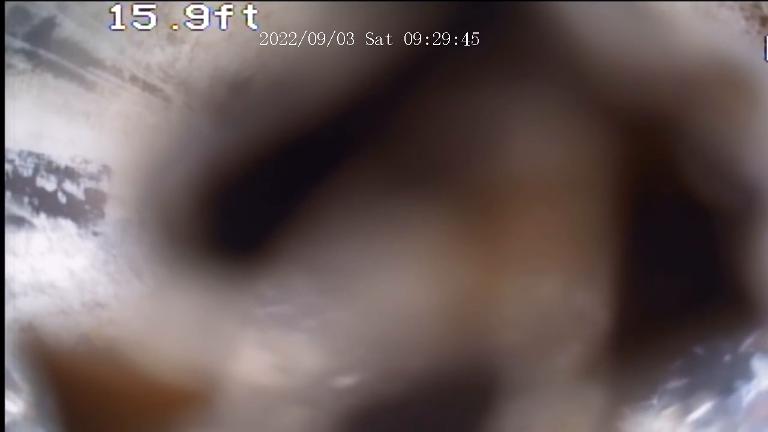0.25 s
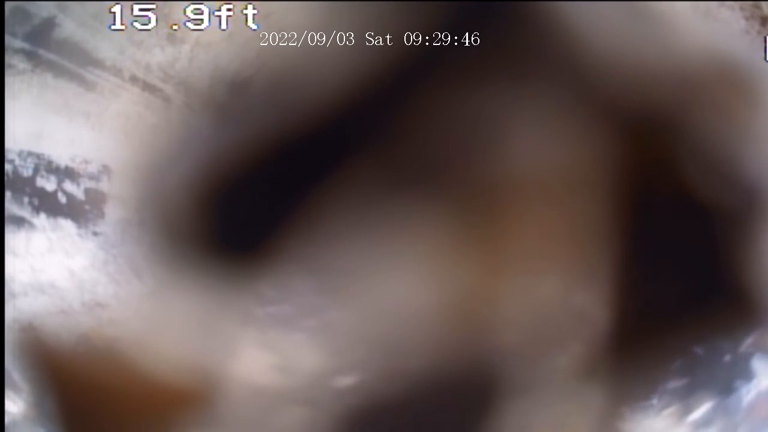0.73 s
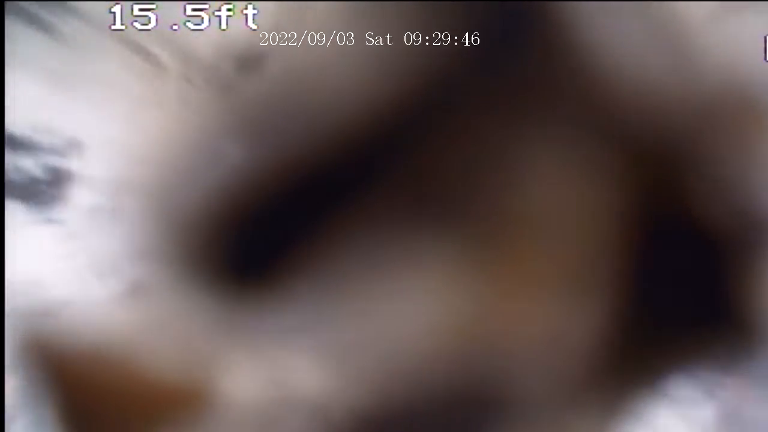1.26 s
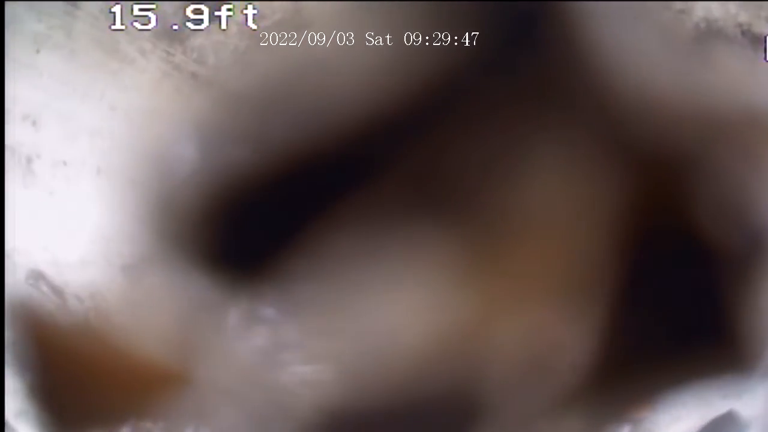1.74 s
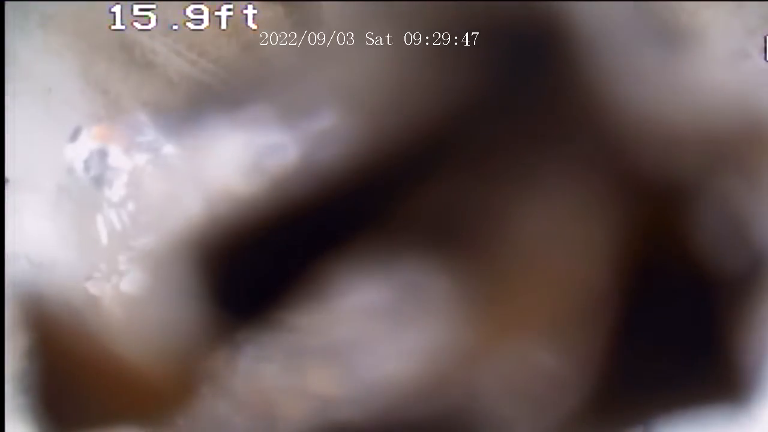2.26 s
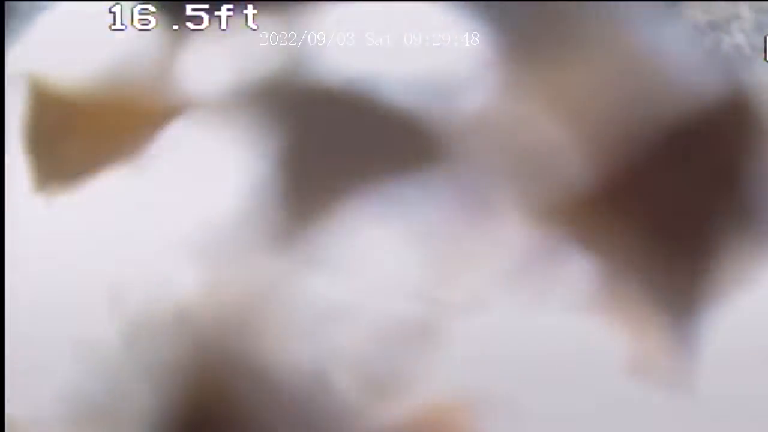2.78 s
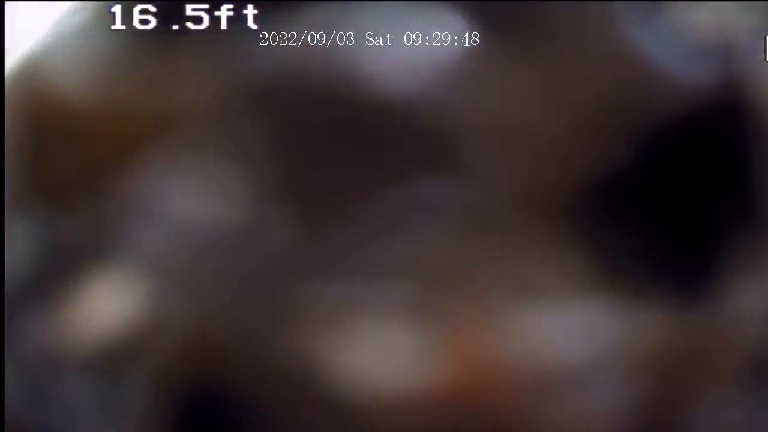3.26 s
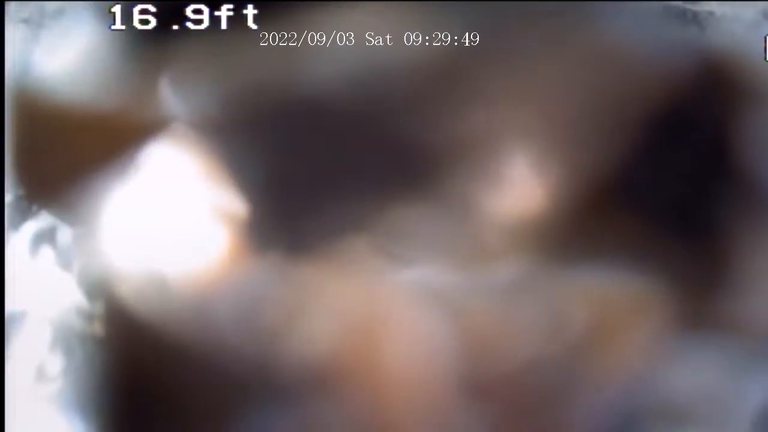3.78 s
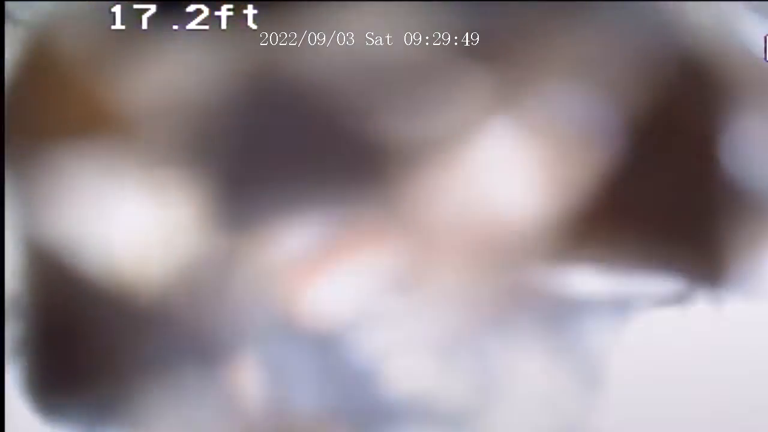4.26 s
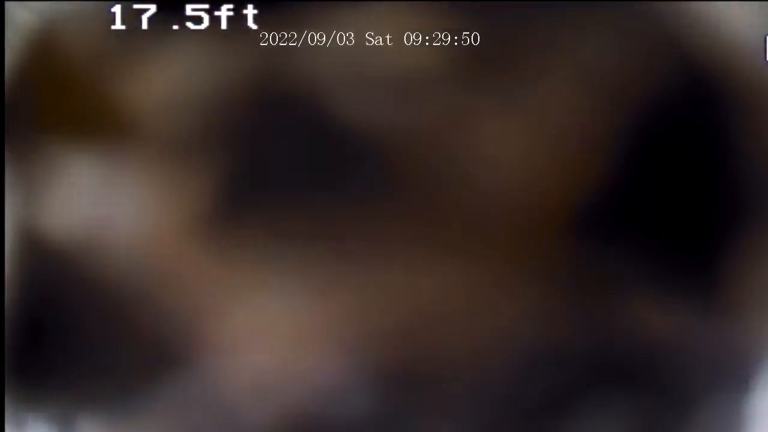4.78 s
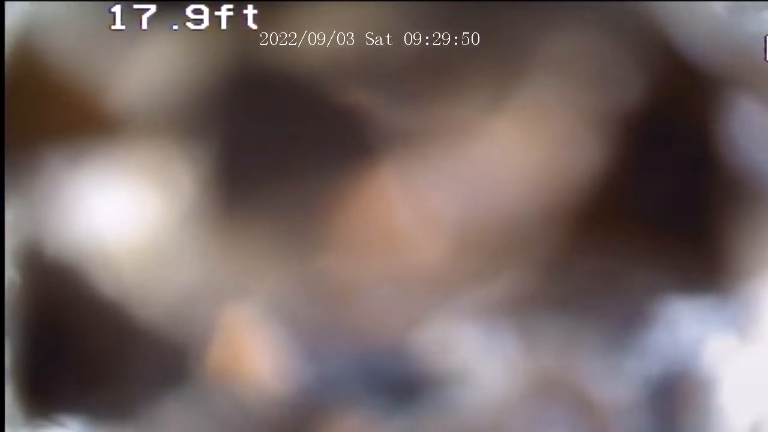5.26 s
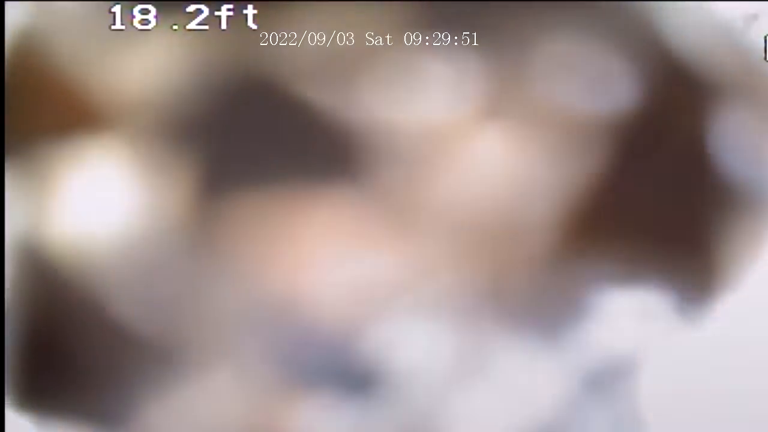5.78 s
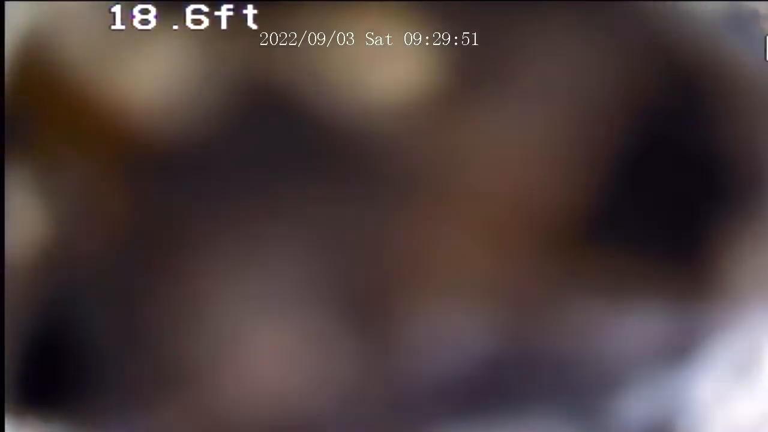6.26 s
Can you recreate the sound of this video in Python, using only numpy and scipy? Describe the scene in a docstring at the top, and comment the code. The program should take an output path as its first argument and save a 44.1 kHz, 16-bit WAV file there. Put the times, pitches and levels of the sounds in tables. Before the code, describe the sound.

In a small room with a short echo, a stiff cable is fed from a reel into a drain pipe. Low, uneven drum rumble, faint rubbing, microphone hiss, a weak whistle and a very thin high whine run throughout. At about 0.16 s a loop slaps the steel frame with a rattle and the loudest hollow bump, leaving a low hum until about 1 s. A dry double clack comes at 1.1, knocks from 1.3, and a knock with a short honk at 1.76. Scrapes lead to a strong knock, thud and honk at 2.34, another knock at 2.5, then total silence from 2.65 to 2.76. A sharp slap and thud hit at 3.26; another slap with a bump at 3.98. From 4.25 to 5.1 lighter knocks cluster, with small honks near 4.63 and 4.75. A soft knock lands at 5.6, then ticks, scrapes and a final slap with double bump at 6.23, fading into rumble.

```python
"""An inspection camera's stiff push cable is fed into a drain in a small room.
From the start: the reel rumbles (driven drum modes), the cable rubs the pipe (stick-slip noise), and
the monitor's microphone adds hiss, a faint whistle and a thin whine. Then a first of four slaps on the
reel's frame, clacks, knocks, bumps, thuds and ticks (struck modes), humming drum tones (decaying sines),
and later honking judders (unsteady sines). The sound cuts out once for a moment."""
import sys
import numpy as np
from scipy import signal
from scipy.fft import rfft, irfft, next_fast_len
from scipy.io import wavfile
from scipy.ndimage import uniform_filter1d, map_coordinates

SR = 44100
rng = np.random.default_rng(int(sys.argv[2]) if len(sys.argv) > 2 else 0)


def waveform_to_disk(signal):
    """Save audio, clipped to [-1, 1], as 16-bit WAV at the path in sys.argv[1]."""
    frames = np.transpose(np.atleast_2d(signal))
    scaled = np.clip(frames, -1, 1) * 32767
    samples = np.round(scaled).astype(np.int16)
    wavfile.write(sys.argv[1], SR, samples)


N = 287532
TIME = np.arange(N) / SR
AGE = TIME[:SR // 2]  # time since the onset of a short event


def amp(db):
    """Decibels to gain."""
    return 10 ** (np.asarray(db) / 20)


def unit(x):
    """Scale to rms 1."""
    return x / np.sqrt(np.mean(x ** 2) + 1e-20)


def crest(x):
    """Scale so that the loudest 5 ms have rms 1."""
    return x / np.sqrt(uniform_filter1d(x ** 2, size=220).max() + 1e-20)


def along(points, hz):
    """Interpolate (f/Hz, value) points on a log frequency axis."""
    f, v = np.transpose(points)
    return np.interp(np.log(hz + 1), np.log(f + 1), v)


def wobble(rate_hz):
    """A smooth random curve with rate_hz knots a second."""
    knots = rng.standard_normal(int(N * rate_hz / SR) + 4)
    return map_coordinates(knots, [TIME * rate_hz])


def swells(rows):
    """Sum of bell-shaped swells from (centre t/s, level/dB, half length/s) rows."""
    return sum(amp(db) * np.exp(-.5 * ((TIME - s) / half_s) ** 2) for s, db, half_s in rows)


def filtered(x, response):
    """x times a complex response of frequency."""
    m = next_fast_len(len(x) + SR // 2)
    return irfft(rfft(x, m) * response(np.fft.rfftfreq(m, 1 / SR)), m)[:len(x)]


def coloured(x, spectrum):
    """x with a broad spectral shape."""
    return filtered(x, lambda f: amp(along(spectrum, f)))


def ring(x, modes):
    """x drives a body's resonances; little radiates outside their range."""
    y = 0
    for k, (hz, width_hz, db) in enumerate(modes):
        b, a = signal.iirpeak(hz, hz / width_hz, SR)
        y = y + (-1) ** k * amp(db) * signal.lfilter(b, a, x)  # alternating phase
    edges_hz = [modes[0][0] * 0.59, min(modes[-1][0] * 1.27, SR * .45)]
    return signal.sosfilt(signal.butter(2, edges_hz, 'band', fs=SR, output='sos'), y)


# dB scatter of mode levels: each contact point favours other modes
CONTACT_SPREAD_DB = 1.5


def struck(modes):
    """A body's modes as excited from a random contact point."""
    return [(hz, width_hz, db + CONTACT_SPREAD_DB * rng.standard_normal()) for hz, width_hz, db in modes]


def add(track, s, sound):
    """Mix a sound in at s seconds."""
    start = max(round(s * SR), 0)
    track[start:start + len(sound)] += sound[:max(N - start, 0)]


def chatter(hold_s, t60_s):
    """Contact force: a dense run of tiny impacts that holds briefly and dies."""
    return rng.standard_normal(len(AGE)) * amp(-60 * np.maximum(AGE - hold_s, 0) / t60_s)


def slips(rate_hz, spread_db):
    """Stick-slip friction: impulses of uneven size at random moments, rms 1."""
    moments = rng.random(N) < rate_hz / SR
    signs = rng.choice([-1, 1], N)
    return unit(moments * signs * amp(spread_db * rng.standard_normal(N)))


def sustained(x, span_s):
    """Level a vibration to rms 1 over span_s, as under a constant push."""
    return x / np.sqrt(np.abs(uniform_filter1d(x ** 2, max(int(span_s * SR), 2))) + 1e-12)


# feed strength, heard as rumble: t/s, level/dB
FEED = [(0, -42.5), (.22, -33), (.4, -45), (.62, -54), (.74, -36.5), (.91, -54), (1.02, -42.5), (1.42, -45),
        (1.68, -65), (1.8, -42.5), (2.05, -52), (2.35, -44.5), (3.15, -53.5), (3.3, -45.5), (3.55, -50.5),
        (3.8, -55), (4.05, -48.5), (4.35, -44.5), (4.47, -56), (4.75, -44.5), (4.87, -54), (5.13, -43.5),
        (5.4, -53), (5.6, -46), (5.73, -49), (5.88, -43), (6.15, -55), (6.52, -45.5)]


def feed_level_db():
    """How hard the cable is fed, sample by sample."""
    s, db = np.transpose(FEED)
    return np.interp(TIME, s, db)


# reel drum's deep and upper resonances: f/Hz, width/Hz, level/dB
DRUM_DEEP = [(86, 7.5, -9), (114, 11.3, -6), (144.2, 12.4, -3)]
DRUM_UPPER = [(181.96, 5.4, 1.5), (222.6, 24, -8), (244.4, 97, -12.5)]
UPPER_DRUM_DB, UPPER_SWAY_DB = -3.5, 4  # upper modes against deep ones, and their slow drift


def reel():
    """Small jolts keep the drum's low modes ringing, louder as the cable is fed harder."""
    deep = sustained(ring(slips(rate_hz=500, spread_db=2), DRUM_DEEP), span_s=0.16)
    upper = sustained(ring(slips(rate_hz=500, spread_db=0.5), DRUM_UPPER), span_s=0.053)
    upper_gain = amp(UPPER_DRUM_DB + UPPER_SWAY_DB * wobble(7.0))
    return amp(feed_level_db() - 3.5) * (deep + upper_gain * upper)


# catches of the jacket on the lip, and the even rub between them (gain)
SNAG_RATE_HZ, SNAG_DECAY_S, SMOOTH_GAIN = 60, 0.0044, 0.68


def snags(rate_hz, decay_s):
    """Grip of a rough surface: sudden releases, each falling to 1/e in decay_s."""
    releases = (rng.random(N) < rate_hz / SR) * rng.uniform(0.22, 1, N)
    return signal.lfilter([1], [1, -np.exp(-1 / (decay_s * SR))], releases)


def friction():
    """Dense slips of the jacket, gripping and letting go unevenly."""
    grip = SMOOTH_GAIN + snags(SNAG_RATE_HZ, SNAG_DECAY_S)
    return slips(rate_hz=1300, spread_db=3.0) * grip


# short strokes of the cable over the pipe's lip: centre t/s, level/dB, half length/s, hardness/dB
SCRAPES = [(0.718, -48.5, 0.033, -3), (0.734, -46, .012, -16), (0.994, -49.5, 0.025, -6),
           (1.789, -45, 0.042, 2.5), (2.17, -46.5, 0.047, -10), (2.298, -43, 0.026, 3),
           (2.368, -45.5, 0.021, 6), (2.907, -53, 0.14, -13), (3.07, -54.5, 0.035, -1),
           (3.145, -54, 0.0085, 2.5), (3.515, -60.5, 0.23, 4.5), (3.72, -54, 0.033, 0.5),
           (3.891, -42.5, 0.015, -7.5), (4.311, -49, 0.04, -4.5), (4.455, -50.5, 0.0099, -5.5),
           (4.655, -49.5, 0.15, -1.5), (4.964, -51.5, 0.033, 1), (5.094, -49, 0.047, -2.5),
           (5.38, -57, 0.019, 4.5), (5.601, -44, 0.039, -9), (5.822, -48.5, 0.043, -5.5),
           (5.941, -47.5, 0.024, -3), (6.06, -49.5, 0.047, -10), (6.16, -42.5, 0.013, -1)]
# smooth glides in which the swish swells: centre t/s, level/dB, half length/s
GLIDES = [(5.65, -71.5, 0.077), (6.46, -73.5, 0.24)]
# resonances of pipe (hollow, upper), reel frame and cable: f/Hz, width/Hz, level/dB
PIPE_HOLLOW = [(343.3, 64, -9), (463.6, 39.5, -2), (534.6, 68.5, -6.5)]
PIPE_UPPER = [(728, 108, 0.5), (843, 67, 1.5), (922, 89, -2), (1038, 80, 2), (1180, 90, -5),
              (1234, 64, -2.5), (1471, 63, -6), (1939, 53, -9), (2170, 74, -18), (2380, 230, -19),
              (2826, 150, -18)]
FRAME = [(337, 40, 4.5), (491, 75, -1), (1081, 97, -7), (1192, 112, -1.5), (1302, 147, -3),
         (1520, 110, -10.5), (1936, 140, -15.5)]
CABLE = [(1050, 320, -4.5), (1331, 170, -0.5), (1941, 50, 0.5), (2202, 62, -2.5), (2480, 64, -6),
         (2694, 80, -6.5), (2915, 61, -6), (3114, 53, -6.5), (3320, 130, -10.5), (3830, 380, -22.5)]
# spectra of the gritty edge and of the airy jacket: f/Hz, level/dB
GRIT = [(300, 1), (700, 10), (1400, -29.5), (1700, -26), (2800, -5), (4000, -8.5), (7000, -14),
        (15000, -46)]
SWISH = [(2500, -4), (4500, -7), (6000, -1.5), (8000, -9), (12000, -13.5), (15000, -18.5)]
DRAG_DB, DRAG_GROWS_DB_PER_DB, USUAL_FEED_DB = -67.5, 0.36, -47.5  # light drag at the usual feed
SWISH_DB = -78.5  # steady swish, before the glides
BODY_SWAY_DB = 1.5  # the pipe's hollow body comes and goes under the rub


def slide():
    """Uneven slips over the pipe's lip swell with each stroke; hard strokes rasp, soft ones sound hollow."""
    drag = amp(DRAG_DB + DRAG_GROWS_DB_PER_DB * (feed_level_db() - USUAL_FEED_DB))
    soft = swells([(s, db, half_s) for s, db, half_s, _ in SCRAPES])
    hard = swells([(s, db + hard_db, half_s) for s, db, half_s, hard_db in SCRAPES])

    rub_level = np.hypot(amp(6.0 + BODY_SWAY_DB * wobble(14)) * drag, amp(-5.5) * soft)
    rub = rub_level * unit(ring(friction(), PIPE_HOLLOW))

    edge = friction()
    grit = amp(-9.5) * unit(coloured(edge, GRIT))
    rasp_level = np.hypot(amp(-5.0) * drag, amp(-10.5) * hard)
    rasp = rasp_level * (unit(ring(edge, PIPE_UPPER)) + grit)

    # the drag keeps the frame and the cable faintly ringing
    fine = rng.standard_normal(N)
    ringing = drag * (amp(2.5) * unit(ring(fine, FRAME)) + amp(-9.0) * unit(ring(fine, CABLE)))

    air = unit(coloured(slips(rate_hz=11000, spread_db=4.5), SWISH))
    swish = amp(-4) * (amp(SWISH_DB) + swells(GLIDES)) * air
    return rub + rasp + ringing + swish


# microphone hiss spectrum: f/Hz, level/dB
HISS = [(20, 18), (36, 2), (50, 10), (70, 17), (200, 11), (700, -13.5), (1700, -13), (4000, -25),
        (5200, -15.5), (6300, -25), (8500, -30.5), (15500, -29.5)]
# faint whistle in the hiss: f/Hz, width/Hz, rms level/dB
WHISTLE = (4953, 30, -85)
# the picture's line whine: f/Hz, rms level/dB
WHINE = (15626, -88)


def monitor():
    """Shaped noise hisses, narrow-band noise whistles faintly, a steady sine whines."""
    hiss = amp(-56.5) * unit(coloured(rng.standard_normal(N), HISS))
    hz, width_hz, db = WHISTLE
    narrow = filtered(rng.standard_normal(N), lambda f: 1 / (1 + (2 * (f - hz) / width_hz) ** 2))
    whistle = amp(db) * unit(narrow)
    whine_hz, whine_db = WHINE
    whine = amp(whine_db) * unit(np.sin(2 * np.pi * whine_hz * TIME))
    return hiss + whistle + whine


# hard contacts of the cable: t/s, level/dB, brightness/dB
TICKS = [(0.2527, -46, -27), (0.43, -56, -35), (1.011, -61, -9), (1.183, -46.5, -7.5), (1.375, -51.5, -10),
         (1.4484, -50.5, -25), (1.5506, -54.5, -7), (1.689, -52.5, -11.5), (1.9445, -57, -11),
         (2.106, -56.5, -7.5), (2.265, -51.5, -34), (2.292, -49, -14), (2.43, -53, -11.5),
         (2.808, -61.5, -9), (3.13, -61.5, -22), (3.2455, -40.5, -20), (3.8681, -46.5, -11.5),
         (4.555, -65, -2.5), (4.667, -57.5, -11), (4.702, -64, -10), (4.916, -55, -5.5), (5.446, -54.5, -9),
         (5.912, -61, -15), (6.138, -57, -6.5), (6.164, -51, -12.5)]
# treble spectrum of a hard contact: f/Hz, level/dB
SNAP = [(1500, -27), (3500, 1), (4700, 1), (7000, 0.5), (8500, -6.5), (11500, -6.5), (15000, -24.5)]


def ticks():
    """Hard contacts, slaps included, ring the cable and snap in the treble by their brightness."""
    out = np.zeros(N)
    from_slaps = [(s, db, bright_db) for s, db, bright_db, _ in SLAPS]
    for s, db, bright_db in TICKS + from_slaps:
        body = crest(ring(chatter(hold_s=0.0033, t60_s=0.046), struck(CABLE)))
        force = chatter(hold_s=0.0053, t60_s=0.066) + amp(-18.0) * chatter(hold_s=0.011, t60_s=0.71)
        snap = crest(coloured(force, SNAP))
        add(out, s - .002, amp(db - 2.5) * body + amp(db + bright_db - 1.5) * snap)
    return out


# dry clacks of the cable guide: t/s, level/dB
CLACKS = [(0.157, -50), (1.084, -42), (1.094, -47), (3.262, -43), (3.98, -56), (6.231, -52)]
# guide resonances: f/Hz, width/Hz, level/dB
GUIDE = [(770, 220, 0.5), (1060, 140, 6.5), (1430, 460, -4.5), (1910, 220, 2), (2160, 240, 5),
         (2410, 300, -9), (3040, 510, -10.5)]


def clacks():
    """The guide is rapped and damped at once by the cable lying in it."""
    out = np.zeros(N)
    for s, db in CLACKS:
        add(out, s, amp(db) * crest(ring(chatter(hold_s=0.004, t60_s=0.031), GUIDE)))
    return out


# a loop of cable slapping the frame: t/s, level/dB, brightness/dB, after-rattle/dB
SLAPS = [(.156, -38.5, -18, -13.5), (3.2631, -38.5, -9, -26), (3.979, -41.5, -10.5, -23),
         (6.2317, -40, -8, -23)]
# a slap snaps, rings the frame, knocks the pipe, then rocks the reel: lags after the slap
FRAME_LAG_S, KNOCK_LAG_S, ROCK_LAG_S = 0.002917, .011, 0.032
RATTLE_DB = 7  # uneven drive as the cable bounces on the frame


def slaps():
    """A loop of cable springs against the steel frame, which rings and rattles on."""
    out = np.zeros(N)
    for s, db, _, rattle_db in SLAPS:
        bounce = amp(RATTLE_DB * wobble(120)[:len(AGE)])
        rattle = amp(rattle_db) * chatter(hold_s=0.019, t60_s=0.38)
        force = bounce * (chatter(hold_s=0.0082, t60_s=0.052) + rattle)
        add(out, s + FRAME_LAG_S, amp(db + 2.5) * crest(ring(force, struck(FRAME))))
    return out


# the cable striking the pipe: t/s, level/dB, hardness/dB
KNOCKS = [(.168, -29, -12), (0.437, -54.5, -19), (1.279, -39.5, -7), (1.452, -44, -8.5), (1.691, -46, 0),
          (1.756, -35, -8.5), (2.229, -42.5, -4.5), (2.339, -30, 1.5), (2.403, -46, -6), (2.525, -34, -10),
          (3.024, -44, -3), (3.09, -54, 1.5), (3.251, -34.5, -8), (3.849, -52, 3), (3.872, -43, 5.5),
          (4.247, -42, -10.5), (4.536, -44, -6.5), (4.566, -43, -5), (4.636, -42.5, 1.5), (4.666, -55, -3),
          (4.702, -41, -4), (4.717, -38.5, -4.5), (4.764, -44, -1), (4.924, -43, -3.5), (4.997, -49, -8.5),
          (5.122, -46, -3), (5.446, -44.5, 1), (5.583, -38, -15), (5.91, -43, -1.5), (6.137, -48, 5.5),
          (6.162, -41, -3.5)]
BLOW_DB, BLOW_T60_S = 0.5, 0.018  # first blow over the chatter that follows, and its decay
SLAP_HARDNESS_DB = -5


def knocks():
    """The cable strikes the pipe, slaps included, and chatters briefly, ringing its modes."""
    out = np.zeros(N)
    blow = 1 + amp(BLOW_DB - 60 * AGE / BLOW_T60_S)
    from_slaps = [(s + KNOCK_LAG_S, db, SLAP_HARDNESS_DB) for s, db, *_ in SLAPS]
    for s, db, hard_db in KNOCKS + from_slaps:
        hollow = crest(ring(blow * chatter(hold_s=0.01, t60_s=0.032), struck(PIPE_HOLLOW)))
        hard = crest(ring(blow * chatter(hold_s=0.011, t60_s=0.052), struck(PIPE_UPPER)))
        add(out, s - .003, amp(db - 3.5) * hollow + amp(db + hard_db - 7.0) * hard)
    return out


# clean bumps of the camera head in the pipe: t/s, level/dB
BUMPS = [(.1695, -17), (3.990, -30.5), (6.242, -31), (6.2618, -31)]
# bump modes: f/Hz, level/dB, t60/s
BUMP_MODES = [(444, 0, 0.0055), (1010, -26, 0.023)]


def bumps():
    """The camera head meets the wall squarely: one push of two sines, gone in milliseconds."""
    out = np.zeros(N)
    for s, db in BUMPS:
        for hz, level_db, t60_s in BUMP_MODES:
            add(out, s, amp(db + level_db - 60 * AGE / t60_s) * np.sin(2 * np.pi * hz * AGE))
    return out


# the reel jolted on its stand: t/s, level/dB
JOLTS = [(2.339, -29.5), (3.256, -35), (3.341, -41), (5.592, -39)]
# rocking modes: multiple of the pitch, width/Hz, level/dB
THUD_MODES = [(1, 45, 0), (1.75, 70, -5.5), (2.46, 50, -6)]
THUD_HZ, THUD_SPREAD = 135.2, 0.088  # pitch and its scatter (natural log)
# a knock rocks the reel: more if strong, more if soft
THUD_DB, THUD_GROWS_DB_PER_DB, THUD_SOFTNESS_DB_PER_DB = -30, 0.47, 1
SLAP_ROCK_DB = 9.5  # rocking against the slap


def thuds():
    """Knocks, slaps and jolts rock the reel on its stand: soft, short, low thuds."""
    out = np.zeros(N)
    rocks = [(s, THUD_DB + THUD_GROWS_DB_PER_DB * db - THUD_SOFTNESS_DB_PER_DB * hard_db)
             for s, db, hard_db in KNOCKS]
    rocks += [(s + ROCK_LAG_S, db + SLAP_ROCK_DB) for s, db, *_ in SLAPS]
    for s, db in rocks + JOLTS:
        hz = THUD_HZ * np.exp(THUD_SPREAD * rng.standard_normal())
        modes = [(hz * k, width_hz, level_db) for k, width_hz, level_db in THUD_MODES]
        thud = ring(chatter(hold_s=0.0045, t60_s=0.12), modes)
        add(out, s, amp(db - 3.0) * crest(thud))
    return out


# the drum left ringing after a jolt: t/s, level/dB, f/Hz, t60/s
HUMS = [(.241, -30.5, 130.8, 0.36), (0.471, -40.5, 133, 0.4), (0.66, -42.5, 178.5, 0.38),
        (0.789, -46.5, 181.2, 0.6), (3.442, -44.5, 180.3, 0.32), (5.932, -44, 165, 0.36)]


def hums():
    """Now and then one drum mode rings on alone: a decaying sine with a soft onset."""
    out = np.zeros(N)
    onset = 1 - np.exp(-AGE / 0.014)
    for s, db, hz, t60_s in HUMS:
        add(out, s, amp(db + 8.0 - 60 * AGE / t60_s) * onset * np.sin(2 * np.pi * hz * AGE))
    return out


# the cable juddering over the pipe's lip: t/s, level/dB, f/Hz, hold/s
JUDDERS = [(1.758, -38, 457.6, 0.037), (2.338, -28, 449.4, 0.022), (4.628, -40.5, 453, 0.017),
           (4.745, -44.5, 456, 0.04)]


def judders():
    """Slips locked on to the pipe's main mode, as a sine of wandering pitch: a brief, unsteady honk."""
    out = np.zeros(N)
    for s, db, hz, hold_s in JUDDERS:
        pitch_hz = hz * (1 + 0.032 * wobble(110)[:len(AGE)])
        envelope = (1 - np.exp(-AGE / 0.0031)) * amp(-60 * np.maximum(AGE - hold_s, 0) / 0.089)
        add(out, s, amp(db + 0.5) * envelope * np.sin(2 * np.pi * np.cumsum(pitch_hz) / SR))
    return out


# room decay: f/Hz, t60/s
ROOM = [(100, 0.33), (1200, 0.41), (4000, 0.19), (14000, 0.24)]


def room(x):
    """A short diffuse echo, from decaying noise whose treble dies sooner than its lows and mids."""
    hz, t, z = signal.stft(rng.standard_normal(SR // 2), SR, nperseg=256)
    decay = amp(-60 * t / along(ROOM, hz)[:, None])
    tail = signal.istft(z * decay, SR, nperseg=256)[1]
    delayed = np.pad(x, (300, 0))  # samples
    return signal.fftconvolve(delayed, tail / np.linalg.norm(tail))[:N]


def scene():
    """All sources at one microphone; only contacts and judders echo, clacks and bumps least."""
    sharp = ticks() + slaps()
    dull = knocks() + thuds() + judders()
    near = clacks() + bumps()
    echo = room(amp(-5.0) * sharp + amp(-9.0) * dull + amp(-14) * near)
    return (sharp + dull + near + echo + reel() + hums() + slide() + monitor())[None]


# silent gap: start t/s, end t/s
MUTE = (2.650, 2.763)
TOP_HZ = 15780  # band limit


def record(dry):
    """The sound cuts out briefly, and nothing passes above the band limit."""
    live = (TIME < MUTE[0]) | (TIME > MUTE[1])
    return filtered(dry[0] * live, lambda hz: hz < TOP_HZ)[None]


dry = scene()
out = record(dry)
waveform_to_disk(out)
```